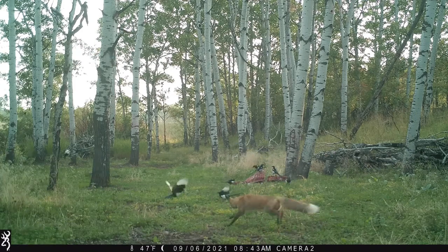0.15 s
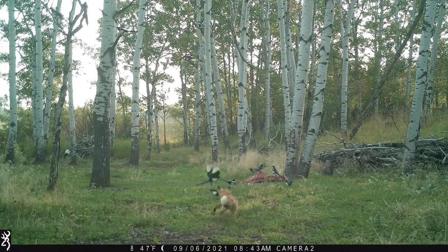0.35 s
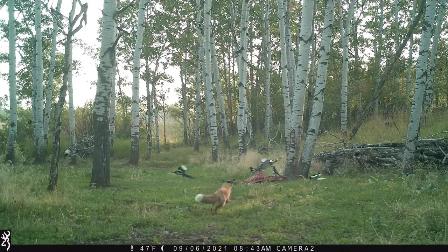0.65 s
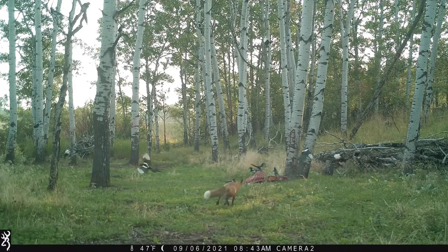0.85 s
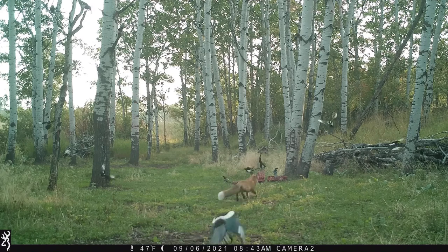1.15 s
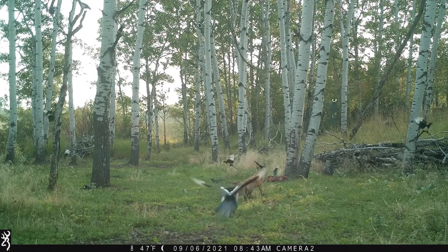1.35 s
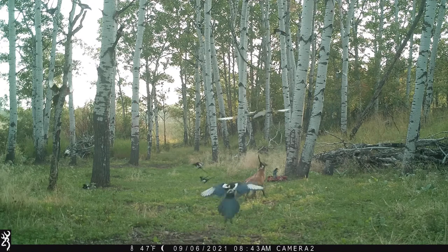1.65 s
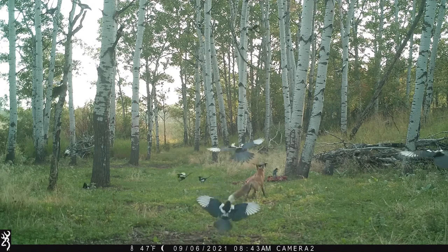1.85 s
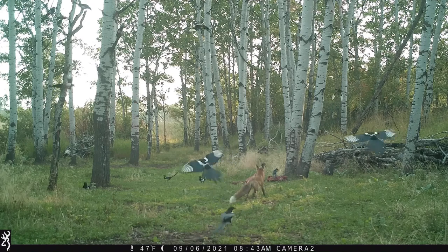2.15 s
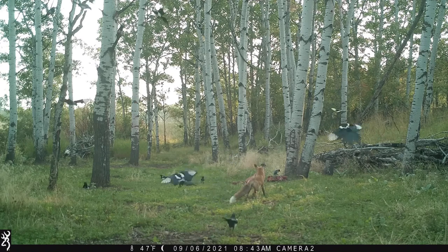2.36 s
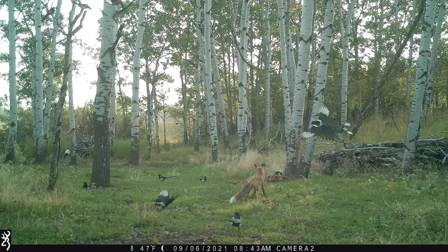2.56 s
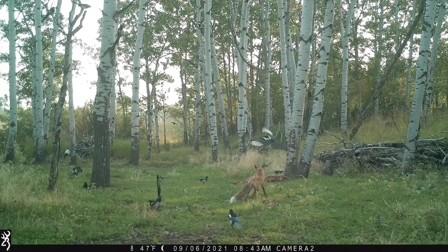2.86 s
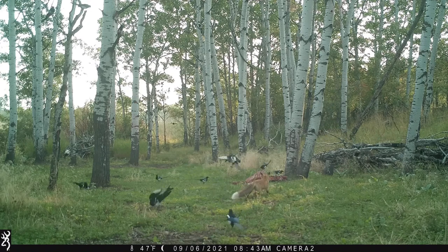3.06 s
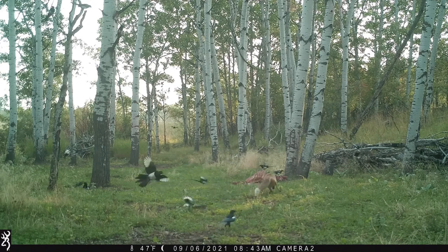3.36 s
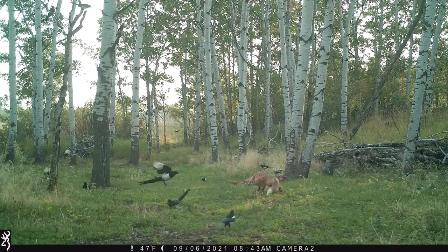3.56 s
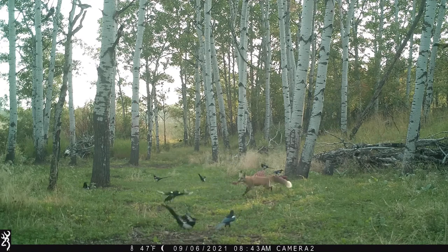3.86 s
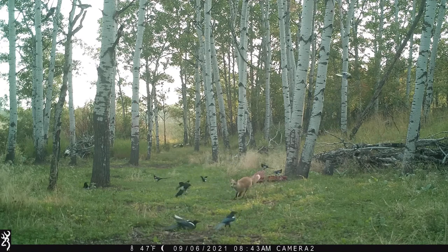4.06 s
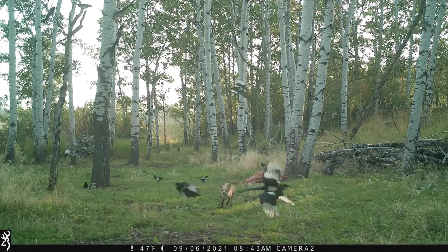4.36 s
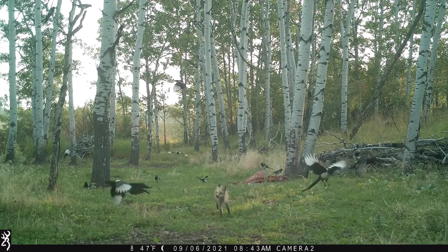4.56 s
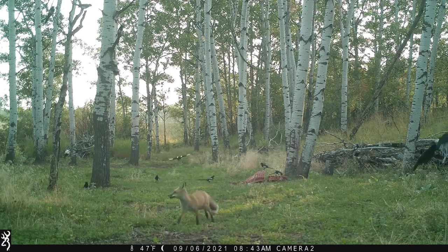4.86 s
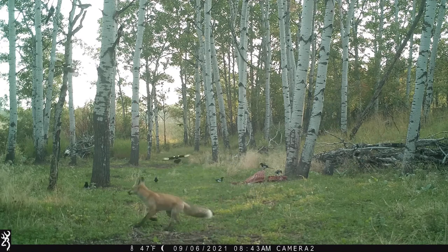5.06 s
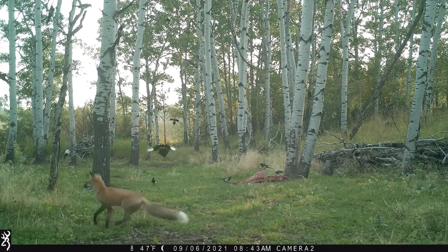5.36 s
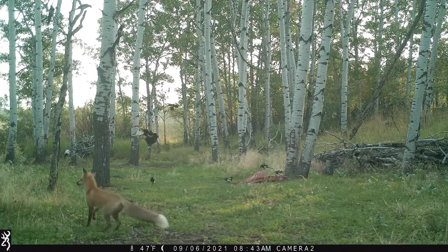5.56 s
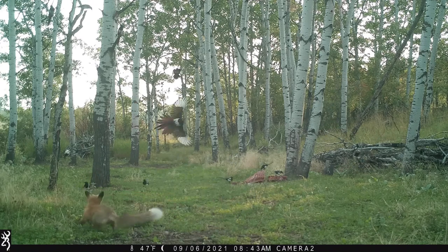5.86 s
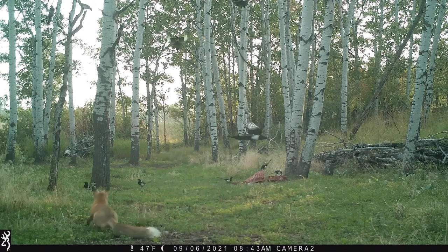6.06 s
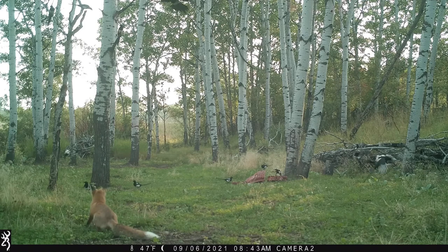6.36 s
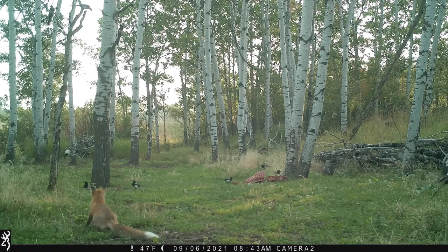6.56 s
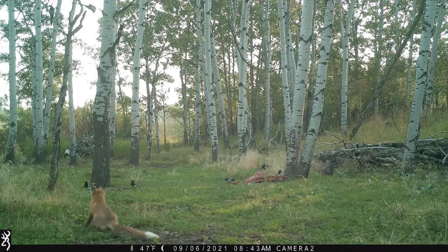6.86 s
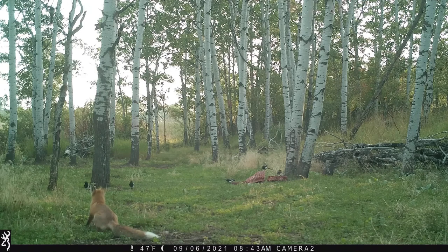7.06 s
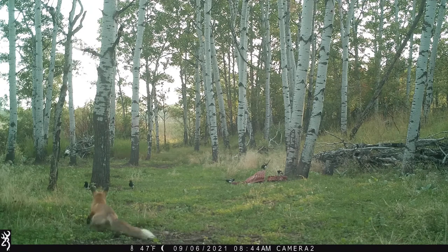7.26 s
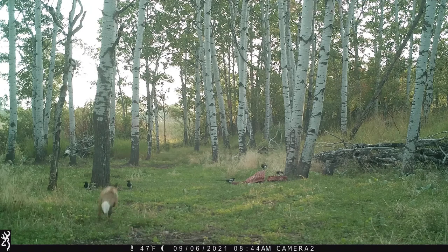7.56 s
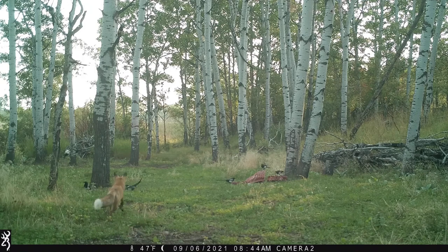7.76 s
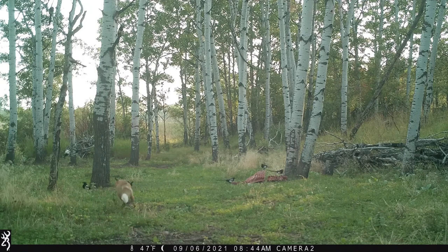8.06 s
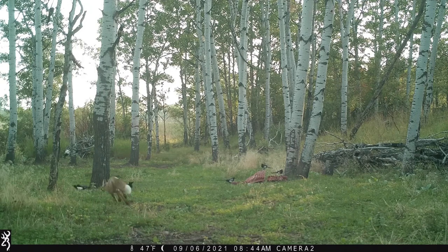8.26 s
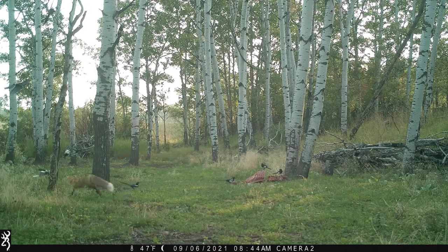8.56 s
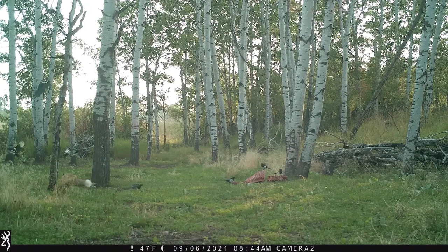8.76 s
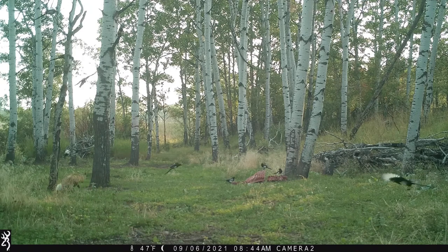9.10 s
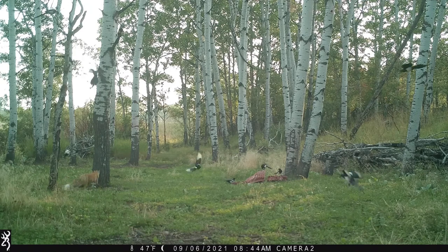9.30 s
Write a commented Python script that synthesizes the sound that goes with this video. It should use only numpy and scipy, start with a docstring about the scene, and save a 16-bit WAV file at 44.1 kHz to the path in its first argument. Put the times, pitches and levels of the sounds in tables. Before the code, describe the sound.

Several magpies chatter in a wooded clearing, their harsh, raspy syllables coming about six a second with a short echo off the trees. Passing wings push soft, low gusts at the microphone. Midway, one bird calls very close and loud, slightly overloading it. After a pause, another short close burst gives way to distant, then nearer chatter. A few dry snaps and dull knocks on the microphone's case sound over a steady hush.

```python
"""Magpies mobbing a fox

Near and far in an aspen clearing, magpies chatter in bouts of about six harsh syllables a second.
Each is a rough croak of the syrinx climbing into a clearer crest, echoed by ground and trunks.
Wings push air at a trail camera's microphone, its case is knocked, and the nearest bird overloads it.
Soft contact notes and dry snaps sound over a steady forest hush."""
import sys
import numpy as np
from scipy import signal
from scipy.fft import rfft, irfft, next_fast_len
from scipy.io import wavfile

SR = 44100
rng = np.random.default_rng(int(sys.argv[2]) if len(sys.argv) > 2 else 0)


def wav_out(sig):
    """Save sig, one row per channel (or a flat mono array), as 16-bit PCM at SR to the path in sys.argv[1]."""
    wavfile.write(sys.argv[1], SR, np.round(np.clip(np.atleast_2d(sig).T, -1, 1) * 32767).astype(np.int16))


N = 415863

# syllable crests: t/s, top f/Hz, level/dB
CHAKS = [(.464, 775, -23), (.611, 803, -19), (.844, 780, -43), (1.046, 734, -22), (1.093, 719, -25.5),
         (1.19, 758, -20.5), (1.235, 727, -22), (1.325, 720, -27), (1.385, 770, -20.5), (1.462, 830, -25),
         (1.529, 731, -19), (1.615, 734, -22.5), (1.693, 750, -20), (1.777, 741, -19), (1.866, 756, -22),
         (1.946, 791, -18.5), (2.11, 735, -21.5), (2.295, 739, -22), (2.497, 801, -20), (2.686, 818, -21),
         (2.875, 731, -20), (3.066, 803, -20.5), (3.238, 740, -24.5), (3.399, 745, -23),
         (3.563, 743, -23.5), (3.739, 748, -23.5), (4.156, 735, -22.5), (4.277, 819, -18.5),
         (4.408, 832, -20), (4.516, 808, -8.5), (4.678, 818, -11.5), (4.83, 800, -9.5), (5.002, 787, -12),
         (5.168, 822, -8), (5.346, 825, -8.7), (5.515, 803, -7.5), (5.685, 809, -9.5), (6.759, 725, -12),
         (6.918, 749, -11.8), (7.09, 771, -13), (7.266, 735, -12.5), (7.376, 762, -31.5), (7.534, 815, -32),
         (7.698, 824, -31), (7.857, 774, -32), (8.035, 790, -29), (8.228, 810, -29.5), (8.407, 727, -24.5),
         (8.527, 832, -17), (8.572, 820, -26), (8.655, 758, -22), (8.762, 829, -17.5), (8.884, 775, -18),
         (8.955, 758, -23.5), (9.035, 752, -18), (9.173, 758, -15.5), (9.35, 740, -16)]
# bouts: start t/s,
# manner (climb/(Hz/s), crest hold/s, body/dB, croak share of gap, croak/dB, upper formant/dB),
# path (ground delay/s, ground gain, forest echo/dB, treble at 10 kHz/dB)
BOUT_STYLES = [(0, (6530, .009, -1.5, .47, -3, -3.5), (.0012, .19, -1, -10)),
               (.8, (6016, .0038, .5, .78, -3.8, -.5), (.0012, .12, -7, -3)),
               (2, (6016, .0038, -.5, .58, -4.5, 0), (.0012, .12, -8, -3.5)),
               (2.95, (6016, .0038, 1.5, .6, -3.5, -3), (.0012, .12, -8, -4)),
               (4, (6016, .0038, 2.5, .48, -8, -5.5), (.0012, .12, -8, -3)),
               (4.44, (8990, .016, .3, .54, -5, 0), (.00123, .25, -12.5, -.5)),
               (6.6, (6800, .0013, -6, .62, -2.3, -1.2), (.0024, .44, -15.5, 3)),
               (7.32, (4980, .0022, -1, .64, -1.7, 3), (.000816, .36, -2.5, -2)),
               (8.35, (5990, .012, .5, .59, -2, -1.5), (.0011, .096, -5.5, .5))]
# throat and open beak response: f/Hz, gain/dB
THROAT_RESPONSE = [(300, -34), (700, -24), (1050, -26.5), (1550, -11.5), (2100, -6.5), (2850, -2.5),
                   (3500, -12), (4200, -11.5), (5100, -3.5), (6300, -12), (8000, -13.5), (15500, -39)]
# crest harmonics before the throat, from the first up: level/dB
CREST_HARMONICS_DB = [-1, -2, -5, 4, -2, -4, 1, -1]
# forest decay: f/Hz, T60/s
FOREST_DECAY = [(300, 0.62), (2800, 1), (12000, 0.58)]
# contact notes: centre t/s, length/s, top f/Hz, level/dB
CONTACT_NOTES = [(5.568, 0.079, 802, -28), (6.101, .075, 812, -41), (6.443, 0.024, 736, -41)]
# knocks on the case: t/s, thud level/dB, ring level/dB
CASE_KNOCKS = [(1.03, -35.5, -34), (7.75, -29.5, -33.5), (7.96, -46, -44), (8.286, -40, -38.5),
               (8.476, -44, -41)]
# case modes: f/Hz, level/dB, T60/s
CASE_MODES = [(100.6, 1, 0.26), (255, 3, 0.39), (427, -4, 0.33), (663, 8, 0.023)]
# dry snaps: t/s, level/dB
SNAPS = [(1.031, -16.5), (4.356, -20.5), (4.58, -22.5)]
# wing gusts: peak t/s, 20 dB fade/s, level/dB
WING_GUSTS = [(.23, .115, -21), (.74, .17, -37), (1.54, .45, -37), (3.01, .15, -46), (3.55, .45, -37),
              (4.25, .17, -34), (4.5, .1, -35)]
# gust spectrum: f/Hz, relative density/dB
GUST_SPECTRUM = [(50, 1.5), (170, -18.5), (2000, -100)]
# still forest and hiss: f/Hz, relative density/dB
HUSH_SPECTRUM = [(24, -22), (40, -2.5), (514, -9.5), (980, -15), (1140, -16.5), (1570, -17.5), (2110, -16),
                 (15000, -25.5)]


def magpies():
    """Each syllable arrives directly, off the ground and through the trees."""
    track, throat = np.zeros(N), impulse_response(THROAT_RESPONSE)
    t = np.arange(-SR // 7, SR // 18) / SR  # crest at t = 0
    for (crest_s, top_hz, db), gap_s in zip(CHAKS, gaps_s()):
        _, manner, path = [bout for bout in BOUT_STYLES if bout[0] <= crest_s][-1]
        delay_s, bounce, echo_db, treble_db = path
        voice = syllable(t, throat, top_hz, db, gap_s, manner)
        call = filtered(voice, lambda hz: amp(along([(5500, 0), (10000, treble_db)], hz)))
        with_ground = filtered(call, lambda hz: 1 + bounce * np.exp(-2j * np.pi * hz * delay_s))
        add(track, crest_s + t[0], with_ground / np.hypot(1, bounce))
        add(track, crest_s + t[0], amp(echo_db) * forest(call))
    return track


def gaps_s(hurried_s=.115, usual_s=.175, pause_s=.2):
    """Pace per syllable: time since the last or, after a pause, until the next; clamped."""
    between = np.diff([row[0] for row in CHAKS])
    since, until = np.append(np.inf, between), np.append(between, np.inf)
    return np.clip(np.where(since > pause_s, until, since), hurried_s, usual_s)


def syllable(t, throat, top_hz, db, gap_s, manner, beak_db=3):
    """One 'chak': pressure builds through the croak until the syrinx settles into a clear crest."""
    climb_hz_per_s, hold_s, body_db, croak_share, croak_db, upper_db = manner
    croak_s = croak_share * gap_s
    pitch_hz = pitch_arch(t, top_hz, climb_hz_per_s * amp(rng.standard_normal()))
    cycles = np.cumsum(pitch_hz) / SR + rng.random()
    rough = formant_bands(signal.fftconvolve(rasp(t, cycles), throat)[:len(t)])
    rough /= rough[:2].sum(0).std()
    clear = formant_bands(squeal(t, cycles, pitch_hz))
    near_crest = np.abs(t + .015) < .02
    clear /= clear[:2].sum(0)[near_crest].std()
    clear_share = np.interp(t, [-.08, -.04, -.018], [.2, .45, .82])
    body, main, upper = np.sqrt(1 - clear_share) * rough + np.sqrt(clear_share) * clear
    # the beak opens: the body gives way to the main formant, then the upper
    body *= amp(body_db + beak_db * np.interp(t, [-.08, -.01], [1, -.3]))
    main *= amp(np.interp(t, [-.11, -.04, -.016, .01], [-4, -.5, 2, 0]))
    upper = unit(upper) * amp(upper_db + np.interp(t, [-.11, -.07, -.018, .012], [-12, -7.5, 2, -1]))
    swell_db = croak_db * np.interp(t / croak_s, [-.65, -.25], [1, 0])
    attack = (1 + np.tanh((t + croak_s) / .011)) / 2
    release = (1 - np.tanh((t - hold_s) / .007)) / 2
    return amp(db + swell_db) * attack * release * (body + main + upper)


def pitch_arch(t, top_hz, climb_hz_per_s, croak_drop=.38, creep_hz_per_s=1600):
    """Pitch creeps up through the croak, climbs steeply, peaks at t = 0 and falls faster."""
    arch_s = np.hypot(np.where(t > 0, 1.8 * t, t), .004) - .004
    croak_hz = top_hz * (1 - croak_drop) * amp(.6 * rng.standard_normal()) - creep_hz_per_s * arch_s
    return np.maximum(top_hz - climb_hz_per_s * arch_s, np.maximum(croak_hz, 200))


def rasp(t, cycles, jitter_s=.0001, puff_s=.0018):
    """Chaotic syrinx beats: uneven pulses, each with a puff of turbulence."""
    beats_s = np.interp(np.arange(1, int(cycles[-1])), cycles, t)
    late, strong = rng.standard_normal((2, len(t)))[:, :len(beats_s)]
    sizes = amp(2 * strong) * np.sqrt(np.gradient(beats_s))
    indices = np.clip((beats_s + jitter_s * late - t[0]) * SR, 0, len(t) - 1).astype(int)
    pulses = np.bincount(indices, sizes, len(t))
    puff_envelope = signal.lfilter([1], [1, -np.exp(-1 / (puff_s * SR))], pulses)
    return unit(pulses - pulses.mean()) + 1.3 * unit(puff_envelope * rng.standard_normal(len(t)))


def squeal(t, cycles, pitch_hz):
    """Voiced part: harmonics sweep through the throat's resonances."""
    phase = 2 * np.pi * (cycles + .013 * noise([(150, 0), (600, -40)], len(t)))
    tone = np.zeros(len(t))
    for k, db in enumerate(CREST_HARMONICS_DB, 1):
        gain = amp(db + along(THROAT_RESPONSE, k * pitch_hz))
        tone += gain * np.sin(k * phase + rng.uniform(0, 2 * np.pi))
    # low in the climb, strong and weak cycles alternate
    doubling = np.interp(t, [-.04, -.008], [1, .15])
    return tone * (1 + doubling * np.sin(phase / 2))


def formant_bands(x, edges_hz=(2150, 3900)):
    """Split a voice into low body, main formant and upper formant."""
    body, below_upper = (filtered(x, lambda hz: 1 / (1 + (hz / edge) ** 12)) for edge in edges_hz)
    return np.array([body, below_upper - body, x - below_upper])


def contact_notes(droop=.194, echo_db=-10):
    """Quiet arched notes, strongest on the second harmonic."""
    track = np.zeros(N)
    for centre_s, length_s, top_hz, db in CONTACT_NOTES:
        u = np.linspace(-1, 1, round(length_s * SR))
        phase = 2 * np.pi * np.cumsum(top_hz * (1 - droop * u ** 2)) / SR
        tone = sum(gain * np.sin(k * phase) for k, gain in enumerate(amp([-24, -3, -15, -20]), 1))
        note = amp(db) * unit(tone * np.cos(np.pi * u / 2))
        add(track, centre_s - length_s / 2, note)
        add(track, centre_s - length_s / 2, amp(echo_db) * forest(note))
    return track


def forest(sound, size=32768, spread_db=4):
    """Trunks scatter uneven echoes; the treble dies first."""
    scatter = rng.standard_normal(size) * amp(spread_db * rng.standard_normal(size // 128)).repeat(128)
    hz, t, spectra = signal.stft(scatter, SR)
    decay = amp(-60 * t / along(FOREST_DECAY, hz)[:, None])
    early_swell = (1 + 3.4 * np.exp(-t / .067)) * (1 - np.exp(-t / .0049))
    tail = signal.istft(spectra * decay * early_swell, SR)[1]
    return signal.fftconvolve(sound, tail / np.linalg.norm(tail))


def knocks(thud_t60_s=.26, attack_s=.0015):
    """Dull knocks ring the camera's case."""
    track, t = np.zeros(N), np.arange(SR // 2) / SR
    for start_s, thud_db, ring_db in CASE_KNOCKS:
        ring = sum(amp(db + 2 * rng.standard_normal() - 60 * t / t60_s) * np.sin(2 * np.pi * hz * t)
                   for hz, db, t60_s in CASE_MODES)
        thud = noise([(200, -8), (800, -7), (3000, -46)], len(t)) * amp(-60 * t / thud_t60_s)
        attack = 1 - np.exp(-t / attack_s)
        add(track, start_s, (amp(thud_db) * thud + amp(ring_db) * ring) * attack)
    return track


def snaps(t60_s=.036):
    """Dry ticks close by: bursts of white noise."""
    track, t = np.zeros(N), np.arange(SR // 2) / SR
    for start_s, db in SNAPS:
        add(track, start_s, amp(db - 60 * t / t60_s) * rng.standard_normal(len(t)))
    return track


def wing_gusts():
    """Air from passing wings buffets the microphone."""
    t = np.arange(N) / SR
    draught = sum(amp(db - 20 * np.abs(t - peak_s) / fade_s) for peak_s, fade_s, db in WING_GUSTS)
    return draught * noise(GUST_SPECTRUM, N)


def hush(rms_db=-44):
    """Still forest and steady hiss."""
    return amp(rms_db) * noise(HUSH_SPECTRUM, N)


def amp(db):
    """dB to gain."""
    return 10 ** (np.asarray(db) / 20)


def unit(x):
    """Scale to rms 1."""
    return x / np.sqrt(np.mean(x ** 2) + 1e-20)


def along(points, hz):
    """Interpolate (f/Hz, value) points over log frequency."""
    points_hz, values = np.transpose(points)
    return np.interp(np.log(hz + 1), np.log(points_hz + 1), values)


def filtered(x, response):
    """Apply the gain response(hz) by FFT."""
    size = next_fast_len(len(x) + SR // 20)
    return irfft(rfft(x, size) * response(np.fft.rfftfreq(size, 1 / SR)), size)[:len(x)]


def noise(spectrum, size):
    """Noise of rms 1, shaped by (f/Hz, level/dB) points."""
    return unit(filtered(rng.standard_normal(size), lambda hz: amp(along(spectrum, hz))))


def impulse_response(spectrum, size=512):
    """Minimum-phase response from (f/Hz, gain/dB) points."""
    cepstrum = irfft(np.log(amp(along(spectrum, np.fft.rfftfreq(size, 1 / SR)))))
    cepstrum[1:size // 2] *= 2
    cepstrum[size // 2 + 1:] = 0
    return irfft(np.exp(rfft(cepstrum)))


def add(track, start_s, sound):
    """Mix a sound into the track."""
    start = max(round(start_s * SR), 0)
    track[start:start + len(sound)] += sound[:max(len(track) - start, 0)]


def scene():
    """The clearing at one microphone."""
    return (magpies() + contact_notes() + knocks() + snaps() + hush() + wing_gusts())[None]


def record(dry, ceiling=1.08, hardness=5, top_hz=15500):
    """The camera soft-clips the loudest peaks and limits the band."""
    clipped = dry[0] / (1 + np.abs(dry[0] / ceiling) ** hardness) ** (1 / hardness)
    return filtered(clipped, lambda hz: np.clip((top_hz - hz) / 100 + 1, 0, 1))[None]


dry = scene()
out = record(dry)
wav_out(out)
```